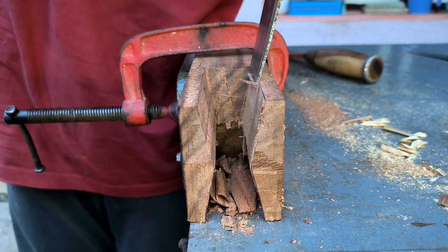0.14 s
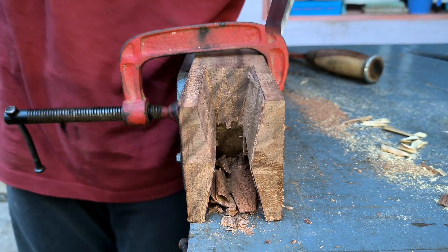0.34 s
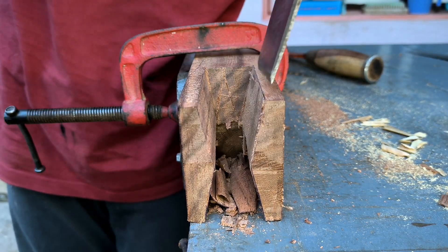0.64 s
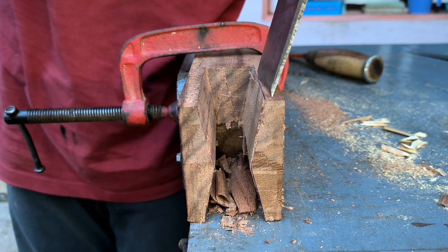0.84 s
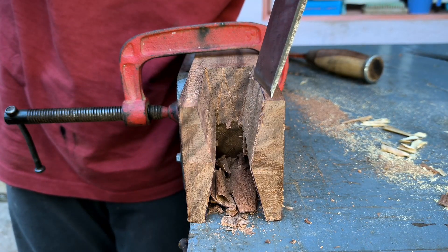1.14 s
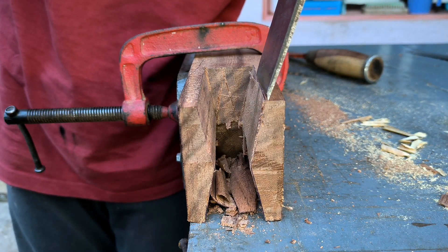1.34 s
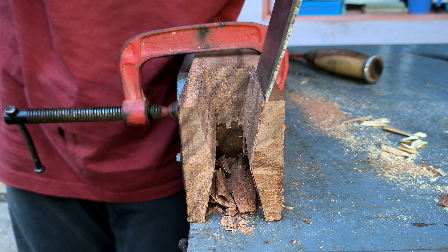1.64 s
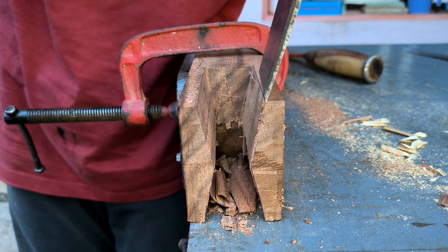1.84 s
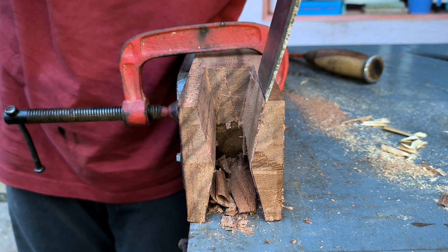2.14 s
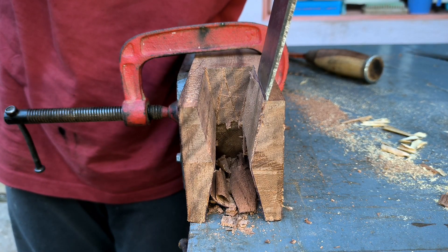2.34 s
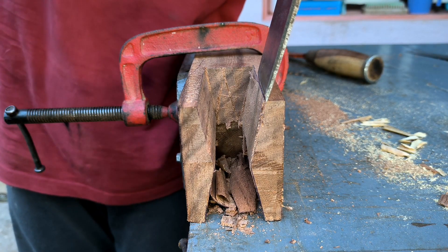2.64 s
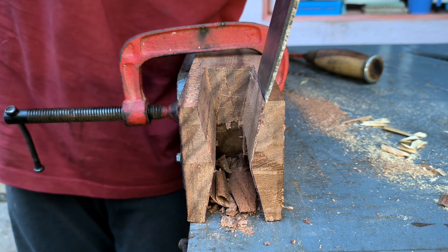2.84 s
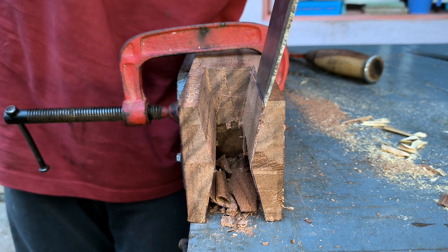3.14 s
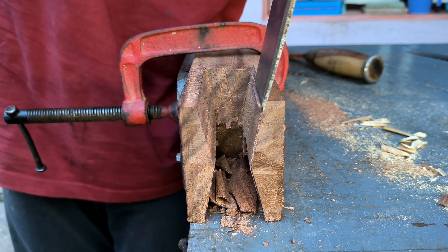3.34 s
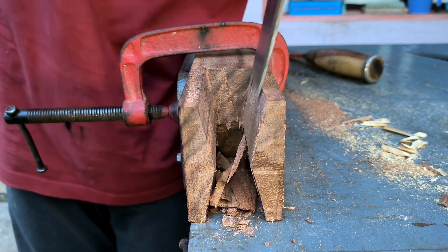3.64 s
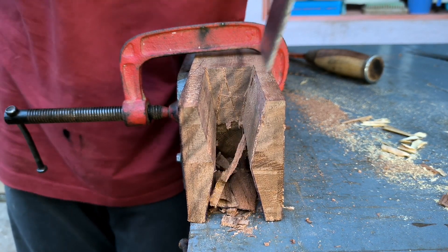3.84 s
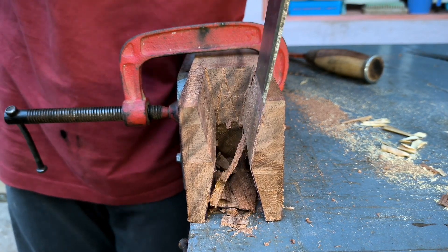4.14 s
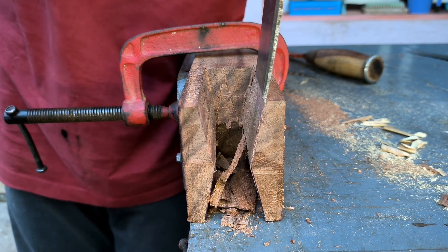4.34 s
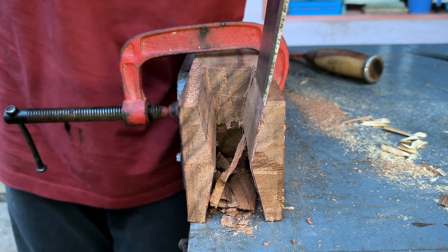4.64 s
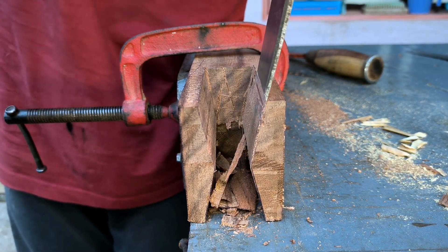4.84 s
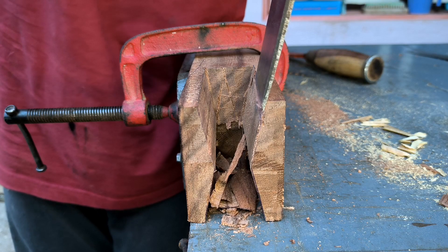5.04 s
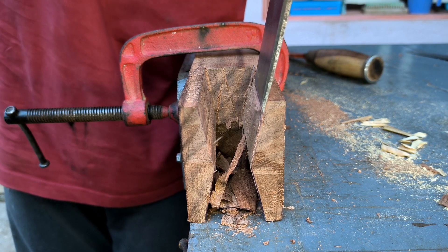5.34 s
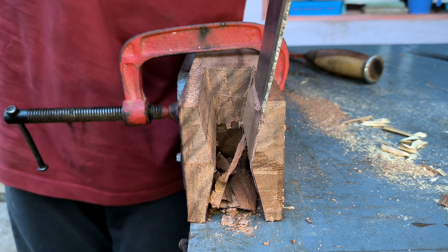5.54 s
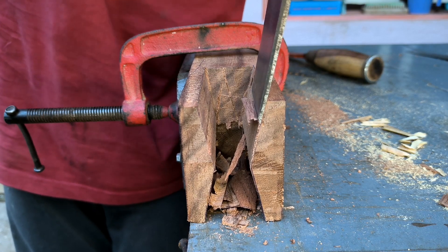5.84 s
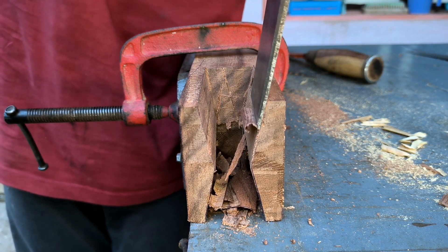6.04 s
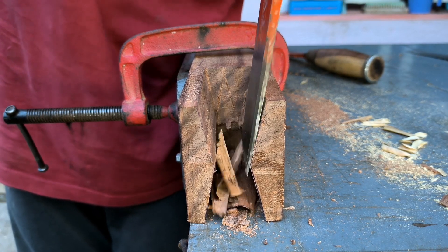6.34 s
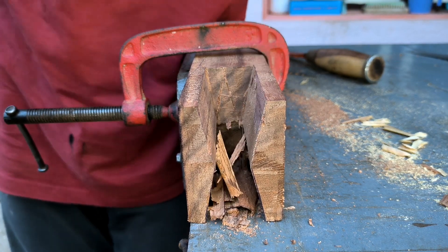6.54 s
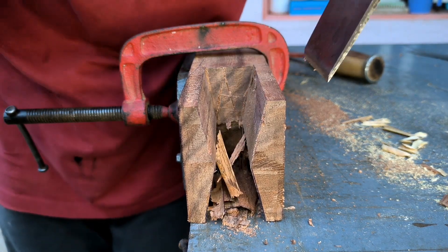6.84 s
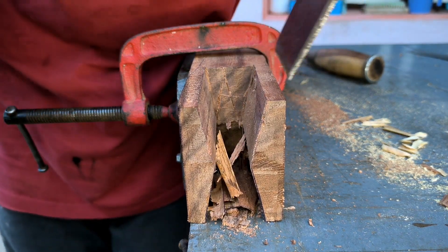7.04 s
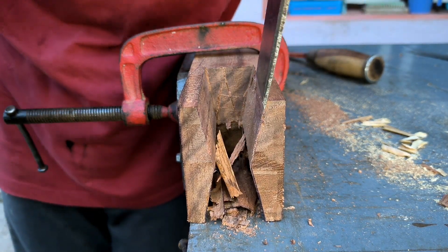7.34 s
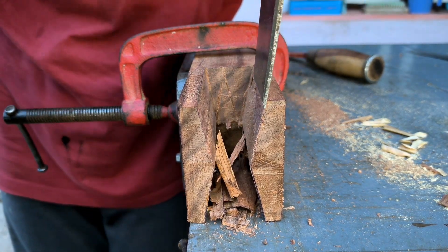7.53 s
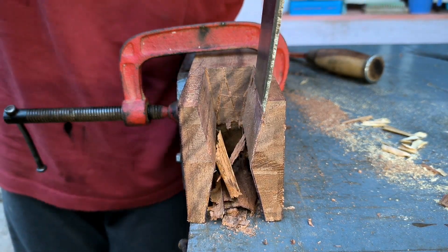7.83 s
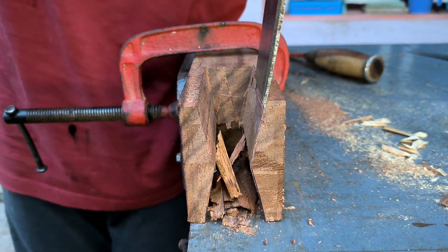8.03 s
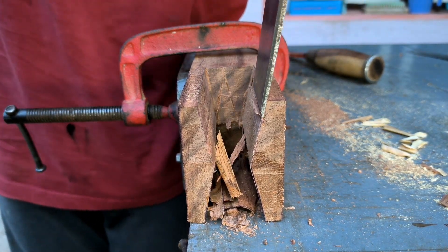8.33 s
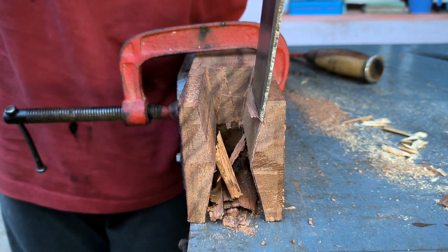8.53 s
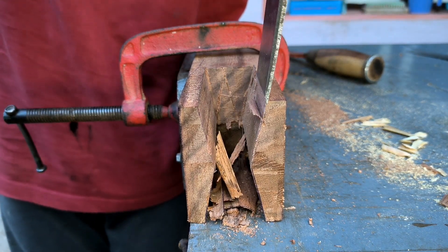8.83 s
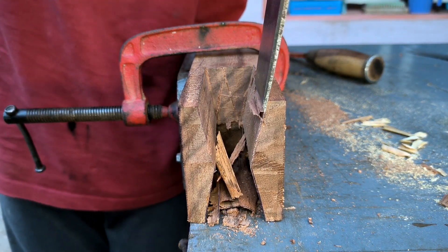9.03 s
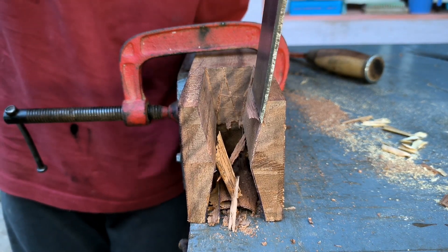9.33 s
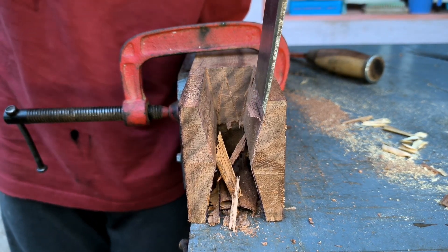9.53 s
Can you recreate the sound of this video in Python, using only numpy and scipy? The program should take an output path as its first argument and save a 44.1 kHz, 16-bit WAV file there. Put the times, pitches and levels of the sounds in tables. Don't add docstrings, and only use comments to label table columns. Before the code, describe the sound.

Close by on an outdoor workbench, a steel blade first ticks and rubs lightly against a clamped wooden block. Then hard, dry knocks come in runs, roughly four a second at first, each with a brief gritty rasp and a thin high metallic ring. Between blows the steel scuffs and the block creaks. Close stereo pickup, short wash from nearby walls, very faint hum and hiss.

```python
import sys
import numpy as np
from scipy import signal
from scipy.fft import rfft, irfft
from scipy.io import wavfile

SR = 44100
rng = np.random.default_rng(int(sys.argv[2]) if len(sys.argv) > 2 else 0)


def gain_from_db(level_db):
    decades = np.asarray(level_db, float) / 20
    return 10 ** decades


def wrap_up_sound(samples):
    columns = np.atleast_2d(samples).T
    tamed = np.clip(columns, -1, 1)
    steps = np.round(tamed * 32767).astype(np.int16)
    wavfile.write(sys.argv[1], SR, steps)


N = 426888
TIME = np.arange(N) / SR

# t/s, peak/dB, thud re peak/dB, first light touch re peak/dB, sharpness/(dB per octave)
BLOWS = [(2.85, -8, -13, -15, 13), (3.108, -7, -16.5, -15.5, 8.5), (3.3401, -6, -19.5, -19.5, 4),
         (3.563, -9, -18, -18.5, 17), (4.0495, -27.5, -7.5, -20, 17), (4.5347, -6.5, -24.5, -31, 15.5),
         (4.782, -9.5, -17, -18.5, 19), (5.1558, -38, -29, -4, 17), (5.445, -10, -14.5, -18, 7.5),
         (5.685, -6, -22, -18.5, 10), (5.9115, -8, -28.5, -16, 8), (6.127, -10.5, -21.5, -16, 16),
         (6.342, -7.5, -19.5, -15, 4.5), (6.536, -43, -17, -18, 25), (6.55, -36.5, -23, -33, 17),
         (7.2801, -32.5, -8, -34.5, -8), (7.919, -11.5, -20, -24, 15.5), (8.2781, -38, 5, -28.5, 7),
         (8.3016, -50.5, 14, -35, -34.5), (8.3318, -8, -17.5, -17, 6.5), (8.5572, -8.5, -27, -18, 22),
         (8.9766, -10, -21, -26.5, 8), (9.1896, -7.5, -15, -25, 7.5)]
BLOCK_HZ = [160, 230, 312, 378, 540, 680, 950, 1240, 1490, 1660, 1900, 2190, 2400, 2850, 3710, 4800]
# level/dB, t60/s
BLOCK_MODES = [(-28, 0.17), (-9, 0.05), (-8, 0.093), (-9.5, 0.087), (-4.5, 0.044), (-3, 0.022),
               (-1, 0.0061), (-2.5, 0.031), (-3.5, 0.019), (2, 0.0096), (-2.5, 0.0096), (-3, 0.0089),
               (-9.5, 0.014), (-13, 0.012), (-10.5, 0.004), (-23, 0.03)]
THUD_BELOW_HZ = 800
# f/Hz, width/Hz, level/dB
STEEL_RINGS = [(5180, 250, -15), (6410, 70, -15), (7680, 160, -20), (8320, 90, -8), (8690, 90, -13),
               (9900, 60, -17), (10600, 70, -14), (11900, 50, -20), (13440, 70, -1), (13730, 40, -13),
               (15060, 50, -15), (15350, 120, -11)]


def rms_of(x):
    return np.sqrt(np.mean(x ** 2) + 1e-20)


def rms_one(x):
    return x / rms_of(x)


def at_hz(points, hz):
    points = np.array(points, float)
    return np.interp(np.log(hz + 1), np.log(points[:, 0] + 1), points[:, 1])


def coloured(x, spectrum):
    gain = gain_from_db(at_hz(spectrum, np.fft.rfftfreq(N, 1 / SR)))
    return rms_one(irfft(rfft(x) * gain, N))


def split(x, hz):
    filters = [signal.butter(4, hz, kind, fs=SR, output="sos") for kind in ("low", "high")]
    return [rms_one(signal.sosfilt(sos, x)) for sos in filters]


def ring(x, hz, t60):
    r, w = gain_from_db(-60 / (t60 * SR)), 2 * np.pi * hz / SR
    return signal.lfilter([0, np.sin(w)], [1, -2 * r * np.cos(w), r * r], x + 1e-18)


def grains(per_s, spread_db, apart=0):
    sizes = gain_from_db(spread_db * np.minimum(rng.exponential(1, (3, N)), 4))
    sizes = sizes * rng.choice([-1, 1], (3, N))
    fibres = sizes * (rng.random((3, N)) < per_s / SR)
    return rms_one(fibres[0] + apart * fibres[1:])


def swells(peak_s, level_db, rise_s, fall_s):
    power = np.zeros(N)
    for s, db, rise, fall in np.broadcast(peak_s, level_db, rise_s, fall_s):
        span = slice(max(int((s - 2 * rise) * SR), 0), int((s + 4 * fall) * SR))
        t = TIME[span] - s
        drop_db = 20 * np.where(t < 0, (t / rise) ** 2, t / fall)
        power[span] += gain_from_db(db - drop_db) ** 2
    return np.sqrt(power)


def flicker(rate, depth_db):
    steps = rng.standard_normal(400)
    return gain_from_db(depth_db * np.interp(TIME * rate, np.arange(len(steps)), steps))


def patchy(x, depth_db):
    edges, out = np.geomspace(2000, 17000, 11), 0
    for pair in zip(edges, edges[1:]):
        band = signal.sosfilt(signal.butter(2, pair, "band", fs=SR, output="sos"), x)
        out = out + band * flicker(30, depth_db)
    return rms_one(out)


def wood(force, tilt_db):
    out = 0
    for k, (hz, (db, t60)) in enumerate(zip(BLOCK_HZ, BLOCK_MODES)):
        gain = gain_from_db(db + tilt_db * (hz < THUD_BELOW_HZ)) / np.sqrt(t60)
        out = out + gain * ring(force, hz, t60) * (-1) ** k
    return rms_one(out)


def blows():
    # upper ring f/Hz, its level/dB, middle ring/dB, lower ring/dB, crack/dB
    landings = [(1900, 6.5, 3.5, -3, -4), (2132, 1, -0.5, -4.5, -5.5), (2176, 4, -1.5, -6.5, -2.5),
                (2280, 2, -0.5, -1, -9), (2060, 2, 0, -1, -16), (2083, 1, 2.5, -2, -8),
                (2180, 3, 2.5, 2, -6.5), (2100, 6, 0, 9.5, -12), (2080, 4.5, -0.5, -3, -3.5),
                (2150, 0, -1.5, 4, -9.5), (2227, 5, 1.5, 0.5, -4), (2260, 3.5, 2.5, 3.5, -3.5),
                (2328, 1, -3, 0, -0.5), (2180, -4.5, 0, 0, 7), (2170, 3, 8, 1, 1.5), (2250, 10, 5, -5, 0),
                (2107, 2.5, 1.5, 1, -6), (2190, -10, 0, -14, -10), (2190, -0.5, 8, 1.5, 1.5),
                (2266, -4, -2, 0.5, -2), (2247, 2.5, 1.5, 1, -7), (2090, 0, 1, -0.5, 4.5),
                (2250, -4.5, 0.5, 0.5, 0)]
    # deepest modes/dB, modes near 350 Hz/dB, modes near 600 Hz/dB
    thud_levels = [(0.5, 2.5, -1), (-7, 2, 0.5), (0.5, -0.5, -2), (6, 4, -2.5), (4, -3, 2),
                   (-11.5, 0.5, -3), (-3, 5, -3.5), (0.5, 0, -13), (-1.5, 0, 2), (1.5, -1, -0.5),
                   (2, 4.5, -1.5), (6, 4.5, 0.5), (-0.5, -1.5, -1.5), (-2, 7, 2), (7, -3, -2),
                   (3, -0.5, 5.5), (7.5, 2.5, -3), (2, 0.5, -1.5), (2, -4, 4), (-1, -3, 2.5),
                   (4.5, -4, 0.5), (0.5, 3, 3.5), (0.5, -3, -2)]
    ring_edges = [270, 450, 800, 1350, 1800, 2500]
    hz = np.array(BLOCK_HZ)[:, None]
    mode_db, t60 = np.transpose(BLOCK_MODES)[:, :, None]
    low, group = hz < THUD_BELOW_HZ, np.searchsorted(ring_edges, hz[:, 0])
    t, out = TIME[:SR // 4], np.zeros(N)
    polarity = (-1) ** np.arange(len(BLOCK_MODES))[:, None]
    swell = np.where(low, 1 - np.exp(-t / 0.0011), 1)
    chances = rng.standard_normal((len(BLOWS), 3, len(BLOCK_MODES), 1))
    for blow, landing, thuds, luck in zip(BLOWS, landings, thud_levels, chances):
        s, peak_db, thud_db, touch_db, sharp_db = blow
        upper_hz, upper, middle, lower, crack = landing
        tilt_db = np.where(low, thud_db + 7, sharp_db * np.log2(np.minimum(hz, 2500) / 1600))
        group_db = np.array([*thuds, lower, middle, upper, crack])[group, None]
        level_db = peak_db + mode_db - 13.0 + tilt_db + group_db
        tuning = (1 + .015 * luck[0]) * np.where(group == 5, upper_hz / 2190, 1)[:, None]
        modes = gain_from_db(level_db - 60 * t / t60) * np.sin(2 * np.pi * hz * tuning * t)
        modes = modes * swell * polarity
        touch = (-.0148, touch_db - 2 * low - 2000 * t, luck[1])
        for delay, gain_db, own in (touch, (0, 6, luck[1]), (.0019, -3, luck[2])):
            start = int((s + delay) * SR)
            out[start:start + len(t)] += np.sum(modes * gain_from_db(gain_db + 2.0 * own), axis=0)
    contact = np.hanning(9)
    return np.convolve(out, contact / contact.sum())[:N]


def slip_rows():
    # peak t/s, steel level/dB, fall/s, top rings re lower rings/dB
    drags = [(2.877, -42, 0.0028, 3), (2.903, -36, .0073, 3.5), (2.92, -40.5, .005, 8),
             (3.154, -36, 0.015, -1.5), (3.181, -45, .01, 10.5), (3.37, -40, 0.0072, -1.5),
             (3.406, -34.5, .0064, 6), (3.608, -33, 0.0083, 9), (4.576, -34, 0.0046, 8.5),
             (4.817, -35.5, .016, 0.5), (5.179, -41.5, .011, 1), (5.489, -30, 0.011, 9),
             (5.709, -44, .014, -14), (5.944, -33, .012, 10.5), (6.18, -36, .012, 10.5),
             (6.383, -37, 0.0091, 2), (7.945, -40.5, 0.022, -3.5), (8.354, -32.5, 0.0027, 6),
             (8.407, -56, .027, -7.5), (8.588, -37.5, .024, 6), (8.603, -40, .0059, 2.5),
             (9.002, -37, .016, -2.5), (9.206, -29.5, .021, 2.5), (9.231, -35.5, .0057, 1.5),
             (9.25, -40.5, .0038, 2)]
    # peak t/s, steel level/dB, fall/s, top re lower rings/dB
    catches = [(2.932, -45, 0.0066, 0.5), (3.384, -36.5, 0.016, 11), (4.067, -36, 0.016, 5),
               (4.086, -27.5, 0.012, 6.5), (4.586, -34, 0.0043, 8), (4.826, -46, .003, 0.5),
               (5.505, -31, 0.0036, 7), (5.736, -31.5, 0.01, 3), (6.165, -33, 0.0065, 13),
               (6.397, -39.5, .017, -1.5), (6.539, -49.5, 0.0058, -2.5), (6.556, -49.5, 0.005, -5),
               (7.964, -32, 0.012, 12), (8.303, -52, 0.04, 5.5), (8.375, -32.5, 0.0038, 2.5),
               (9.019, -29.5, 0.017, 4)]
    hit, peak_db = np.transpose(BLOWS)[:2]
    jolts = np.broadcast_arrays(hit + 0.00092, -29 + 0.53 * peak_db, 0.0021, 0.019, 2.5, 1)
    s, db, fall, top_db = np.transpose(drags + catches)
    since_blow = s - hit[np.searchsorted(hit, s) - 1]
    is_drag = np.arange(len(s)) < len(drags)
    rise = np.where(is_drag, np.minimum(since_blow, 0.034), 0.0017)
    wood_db = -12.5 - 0.11 * top_db
    return np.hstack([jolts, (s, db, rise, fall, top_db, wood_db)])


def slips():
    # f/Hz, level/(dB per Hz)
    teeth_spectrum = [(1470, -44), (2500, -39.5), (4340, -12.5), (5250, -6.5), (6920, -19), (8490, -10),
                      (12200, -22.5), (13900, -8), (16000, -13.5), (16500, -53.5)]
    # f/Hz, level re wood/dB, t60/s
    kerf_rings = [(1230, -10, .03), (1660, -7, .025)]
    top_rings_hz = 11700
    s, steel_db, rise, fall, top_db, wood_db = slip_rows()
    low_share = 1 / (1 + gain_from_db(top_db) ** 2)
    bite = grains(9000, spread_db=3.5, apart=.7)

    push = swells(s, steel_db + wood_db + 6.5, rise, fall)
    force = push * grains(1500, spread_db=6.0, apart=0.11)
    kerf = sum(gain_from_db(db) * rms_one(ring(force, hz, t60)) for hz, db, t60 in kerf_rings)
    out = rms_of(push) * (0.81 * wood(force, tilt_db=1.5) + kerf)

    rasps = split(patchy(coloured(bite, teeth_spectrum), depth_db=2.2), top_rings_hz)
    for rasp, share, top in zip(rasps, (low_share, 1 - low_share), (False, True)):
        push = swells(s, steel_db + 10 * np.log10(share), rise, fall)
        rings = 0
        for hz, width, db in STEEL_RINGS:
            if (hz > top_rings_hz) == top:
                drive = push * bite * flicker(14, 4.5)
                rings = rings + gain_from_db(db) * np.sqrt(width) * ring(drive, hz, 2.2 / width)
        out += .55 * push * rasp + .85 * rms_of(push) * rms_one(rings)
    return out


def snaps():
    # t/s, peak/dB, sharpness/(dB per octave)
    snap_events = [(0.1, -38.5, 10), (0.126, -44, 8), (0.141, -42.5, 0.5), (0.587, -58, 23),
                   (0.632, -61, 1), (0.844, -43, 17), (0.906, -46, -1), (2.898, -23.5, 1.5),
                   (2.931, -30.5, 0.5), (3.158, -21.5, -5), (3.385, -27, -1.5), (4.074, -23.5, 9),
                   (4.563, -21.5, 3.5), (4.949, -39.5, -3), (5.156, -27.5, -6), (5.27, -47.5, -2),
                   (5.489, -21.5, 7), (5.734, -25, -0.5), (6.164, -23, 2.5), (6.377, -22, 2.5),
                   (7.418, -51.5, -6), (7.638, -50, -1), (8.719, -41.5, 6), (8.993, -28, 13),
                   (9.017, -25.5, 4), (9.203, -12.5, 1), (9.549, -53, 4)]
    hz = np.array(BLOCK_HZ)[:, None]
    mode_db, t60 = np.transpose(BLOCK_MODES)[:, :, None]
    t, out = TIME[:SR // 8], np.zeros(N)
    polarity = (-1) ** np.arange(len(hz))[:, None]
    modes = gain_from_db(mode_db - 60 * t / (.9 * t60)) * np.sin(2 * np.pi * hz * t) * polarity
    ping = gain_from_db(-6 - 60 * t / .03) * np.sin(2 * np.pi * 1680 * t)
    for s, peak_db, sharp_db in snap_events:
        start, dull_db = int(s * SR), min(sharp_db, 0)
        knock = np.sum(modes * gain_from_db(peak_db - 12 + sharp_db * np.log2(hz / 1200)), axis=0)
        knock = knock + gain_from_db(peak_db + dull_db * 4.65) * ping
        out[start:start + len(t)] += knock[:N - start]
        out[start:start + 2] += gain_from_db(peak_db - 5.5 + dull_db * 3) * np.array([1, -1])
    return out


def ticks():
    # t/s, peak/dB, brightness/(dB per octave), fall/s
    tick_events = [(0.0947, -47, -4, .006), (0.1022, -34, -6.5, .008), (0.125, -34, -3.5, .003),
                   (0.5881, -37.5, -3.5, .006), (0.635, -39.5, 1.5, .02), (0.846, -32, 0, .006),
                   (2.0487, -45, 0, .01), (2.7364, -38.5, 1, .01), (2.8973, -27.5, 1, 0.0043),
                   (2.931, -33, 1, 0.0034), (3.158, -29, 2.5, 0.0046), (3.249, -49.5, 4, .008),
                   (3.3825, -21, 0.5, .004), (3.757, -46, 2, .002), (3.7853, -44.5, 7, .002),
                   (3.864, -52, 8, .002), (4.0597, -28, -7, .006), (4.086, -46, 40, .005),
                   (4.5555, -36.5, 0.5, .004), (4.5634, -25, -0.5, .004), (4.8, -29.5, 2.5, .005),
                   (5.1746, -36, -4.5, .005), (5.475, -27, -4.5, .005), (5.7351, -20.5, 2.5, .004),
                   (6.1648, -23, 2.5, .004), (6.552, -30.5, -2.5, .004), (7.2878, -58, 0, .004),
                   (7.9389, -31, 0, .005), (7.9617, -26, 0.5, .004), (8.5765, -28.5, 6.5, .005),
                   (8.7789, -45, 10, .004), (8.824, -51, -1, .006), (8.9935, -23, -4, .004),
                   (9.019, -30, -3, .004), (9.202, -29, 6, .004)]
    out, t, hz = np.zeros(N), TIME[:2048], np.fft.rfftfreq(2048, 1 / SR)
    octaves = np.log2(np.clip(hz, 1500, 14000) / 7000)
    bursts = rng.standard_normal((len(tick_events), len(t)))
    for (s, peak_db, bright_db, fall), burst in zip(tick_events, bursts):
        burst = irfft(rfft(burst) * gain_from_db(bright_db * octaves) * (hz > 900))
        start = int(s * SR)
        out[start:start + len(t)] += gain_from_db(peak_db - 8 - 20 * t / fall) * rms_one(burst)
    sing = sum(gain_from_db(db) * ring(out * flicker(25, 2.5), f, 2.2 / width) for f, width, db in STEEL_RINGS)
    return out + gain_from_db(-23) * sing


def rub_rows():
    # peak t/s, hiss level/dB, fall/s, dull re bright hiss/dB
    scuff_events = [(0.093, -56, 0.39, -4.5), (0.108, -46, 0.065, 6.5), (.244, -52, 0.064, -40),
                    (.461, -67, 0.42, 1), (0.542, -57.5, 0.14, -0.5), (0.596, -54, 0.025, 25),
                    (0.645, -49.5, 0.033, -6), (0.852, -47.5, 0.022, -12), (1.247, -62.5, 0.075, 2),
                    (2.052, -51.5, 0.088, -6), (2.745, -46, 0.082, -3.5), (3.249, -57, 0.22, -8),
                    (3.655, -57, 0.013, -4), (4.656, -57, 0.21, -12), (5.045, -54, 0.055, -31),
                    (5.113, -58.5, .25, 1), (5.35, -62.5, .16, -12.5), (5.793, -53, 0.053, 1.5),
                    (5.858, -63, 0.079, -6), (6.095, -60.5, 0.16, 1.5), (6.272, -64.5, 0.37, 2),
                    (6.743, -65.5, 0.087, -5.5), (6.904, -70.5, 0.043, -18.5), (7.485, -66, .02, -20.5),
                    (7.697, -65, 0.052, -27), (8.441, -66.5, .089, -11.5), (8.783, -53, 0.078, -15),
                    (8.83, -52.5, 0.023, 2), (9.561, -64.5, 0.03, 1)]
    # peak t/s, hiss level/dB, fall/s, dull re bright hiss/dB, extra wood/dB
    slide_events = [(.632, -55.5, 0.36, 3.5, -4), (0.851, -57.5, 0.39, -0.5, 0.5),
                    (2.06, -60.5, 0.31, 5.5, -3), (2.199, -64, 0.062, 3, 4), (3.489, -56, 0.21, -5.5, 2.5),
                    (3.64, -57.5, 0.25, -4, 4), (3.783, -60, 0.088, -6.5, 2), (4.915, -54, .015, -4, 3),
                    (4.949, -54.5, 0.095, -0.5, 1.5), (5.043, -57, 0.21, -4, 2),
                    (5.999, -63, 0.19, -7.5, 8.5), (6.498, -60.5, 0.28, 2.5, -1.5),
                    (7.218, -72.5, 0.47, -1, 0.5), (7.637, -71.5, 0.034, 2.5, 6.5),
                    (8.196, -76, 0.43, -25.5, 2.5), (8.29, -64.5, 0.08, -5, 11.5),
                    (8.752, -53, 0.038, -9, 12.5), (8.88, -55.5, 0.064, -29.5, 2),
                    (9.317, -54.5, 0.063, -38, -4), (9.56, -68.5, 0.038, -8, 11.5)]
    hit, peak_db = np.transpose(BLOWS)[:2]
    settle = np.broadcast_arrays(hit + 0.061, peak_db - 48, 0.084, 5.5, 0)
    scuffs = np.vstack([np.transpose(scuff_events), np.zeros(len(scuff_events))])
    s, db, fall, dull_db, wood_db = np.hstack([scuffs, np.transpose(slide_events), settle])
    rise = np.repeat([0.007, 0.058, 0.065], [len(scuff_events), len(slide_events), len(BLOWS)])
    wood_db = wood_db - 8.5 + 0.69 * np.minimum(dull_db, 8.0)
    return s, db, rise, fall, dull_db, wood_db


def rubbing():
    # f/Hz, level/(dB per Hz)
    rub_spectrum = [(1000, -30.5), (2000, -10), (3400, 0.5), (5680, -2), (6390, -5), (10900, -6),
                    (11500, 1.5), (12400, -11), (13700, 7.5), (15500, -5.5), (16500, -37)]
    s, hiss_db, rise, fall, dull_db, wood_db = rub_rows()
    share = 1 / (1 + gain_from_db(dull_db) ** 2)
    hiss = coloured(grains(5000, spread_db=3.5, apart=.7), rub_spectrum)
    dull, bright = split(patchy(hiss, depth_db=1.3), 8000)
    body = wood(grains(2800, spread_db=4.0, apart=0.13), tilt_db=4.0)
    out = swells(s, hiss_db + 10 * np.log10(share), rise, fall) * flicker(41, depth_db=3.0) * bright
    out += swells(s, hiss_db + 10 * np.log10(1 - share), rise, fall) * flicker(38, depth_db=1.5) * dull
    return out + swells(s, hiss_db + wood_db, rise, fall) * body


def creaks():
    # t/s, peak/dB, f/Hz, length/s
    creak_events = [(0.892, -43, 220, 0.017), (2.09, -61, 660, 0.04), (2.168, -51, 632, 0.026),
                    (2.74, -47.5, 683, 0.036), (4.372, -49, 678, 0.02), (4.434, -49.5, 667, 0.07),
                    (4.926, -34, 656, 0.028), (5.017, -47.5, 645, 0.031), (5.058, -53.5, 626, 0.053),
                    (5.265, -47, 229, 0.012), (6.085, -50, 683, 0.021), (6.268, -58, 715, 0.02),
                    (7.419, -59.5, 279, 0.027), (7.644, -72, 221, 0.019), (8.728, -40, 260.5, 0.014),
                    (8.827, -55, 202, 0.032)]
    # t/s, peak/dB, f/Hz, length/s
    chirp_events = [
        (2.275, -61, 2660, 0.038),
        (2.315, -67, 2510, .04),
        (4.9, -58, 1900, .015),
        (7.62, -63, 2110, 0.022),
        (8.72, -41, 2040, 0.024),
        (9.539, -55, 2070, 0.024),
    ]
    out, slip = np.zeros(N), grains(900, spread_db=1.5)[0]
    for s, peak_db, hz, length in creak_events + chirp_events:
        span = slice(int((s - .06) * SR), min(int((s + .3) * SR), N))
        clicks = swells([s + length], peak_db - 13.5, length, length) * slip
        push = np.diff(clicks[span], prepend=0)
        out[span] += ring(push, hz, 0.05 * min(1, 1200 / hz)) * 1150 / hz
        if hz < 1000:
            out[span] += gain_from_db(-11) * (ring(push, 2.3 * hz, .04) + ring(push, 1.78 * hz, .03))
    return out


def air():
    # f/Hz, level/dB
    air_spectrum = [(15, -50.5), (25, -18.5), (48, -8), (192, -5), (410, -11.5), (510, -12.5), (809, -18),
                    (952, -24.5), (1640, -24), (1830, -30), (3320, -20.5), (11600, -27), (12200, -35),
                    (13200, -24.5), (15400, -26.5), (16500, -36)]
    # f/Hz, correlation
    likeness = [(60, 1), (240, 0.077), (950, 0.18), (3770, -0.31), (15000, 0.68)]
    alike = np.clip(at_hz(likeness, np.fft.rfftfreq(N, 1 / SR)), 0, 1)
    mid, side = rfft(rng.standard_normal((2, N)))
    pair = irfft(np.sqrt(1 + alike) * mid + np.sqrt(1 - alike) * side * [[1], [-1]], N)
    no_rumble = signal.butter(4, 122, "high", fs=SR, output="sos")
    return signal.sosfilt(no_rumble, gain_from_db(-64) * coloured(pair, air_spectrum))


def microphones(x):
    # f/Hz, left minus right/dB
    side_levels = [(60, 3), (400, -3.5), (1290, 2), (2380, -0.5), (4400, -1), (8120, -2), (15000, -4)]
    # f/Hz, lead of the left/rad
    left_lead = [(400, 0), (1290, -.7), (1600, 1.3), (2240, 1.5), (3000, 1.2), (4000, 1.9), (8000, 1.3),
                 (13000, 1.1)]
    hz = np.fft.rfftfreq(N, 1 / SR)
    half = gain_from_db(at_hz(side_levels, hz) / 2) * np.exp(.5j * at_hz(left_lead, hz))
    t = TIME[:SR // 2]
    wash = rng.standard_normal((2, len(t))) * gain_from_db(-60 * t / 0.18) * (t > .004)
    wash = wash / np.sqrt(np.sum(wash ** 2) / 2)
    wash = rfft(wash, N) * gain_from_db(-12.5 - 2.0 * np.log2(1 + hz / 2000))
    return irfft(rfft(x) * (np.array([half, 1 / half]) + wash), N)


def scene():
    bench = blows() + slips() + rubbing() + creaks() + snaps() + ticks()
    return microphones(gain_from_db(5.0) * bench) + air()


def low_pass(x):
    return signal.sosfilt(signal.butter(12, 16630, fs=SR, output="sos"), x)


def record(dry):
    thin = signal.sosfilt(signal.butter(1, 110, "high", fs=SR, output="sos"), dry)
    top_cut = signal.cheby2(8, 30, 16100, fs=SR, output="sos")
    rounded = signal.sosfilt(top_cut, 0.48 * np.tanh(thin / 0.55))
    return low_pass(rounded)


dry = scene()
out = record(dry)
wrap_up_sound(out)
```